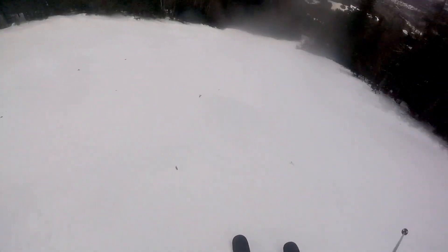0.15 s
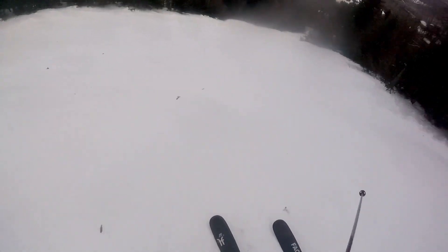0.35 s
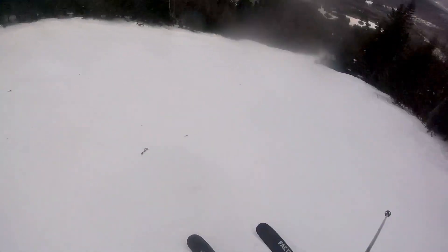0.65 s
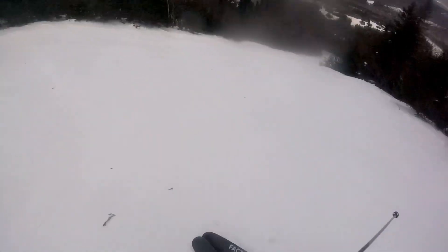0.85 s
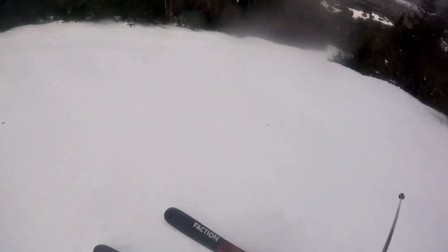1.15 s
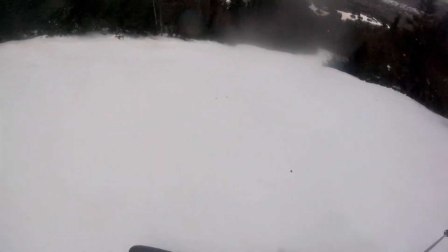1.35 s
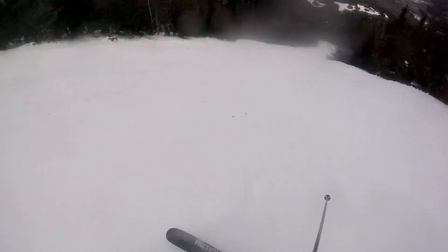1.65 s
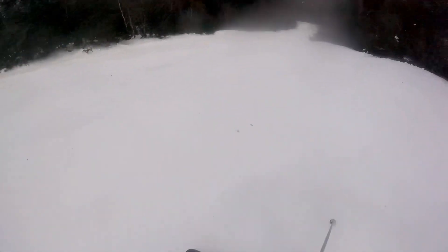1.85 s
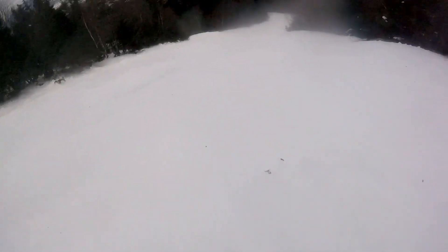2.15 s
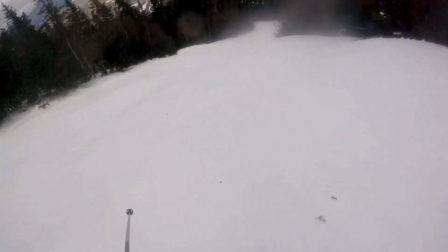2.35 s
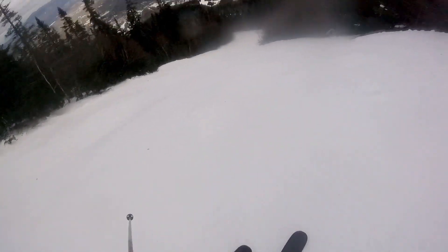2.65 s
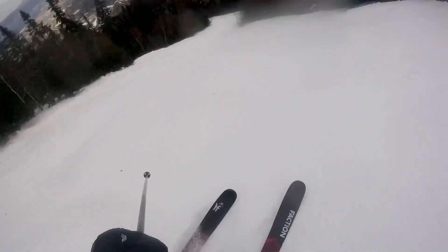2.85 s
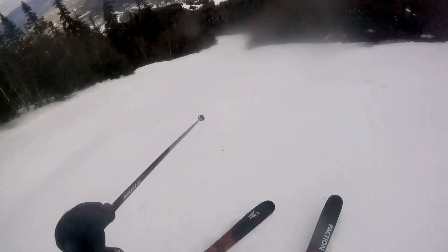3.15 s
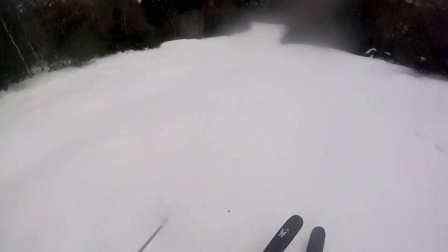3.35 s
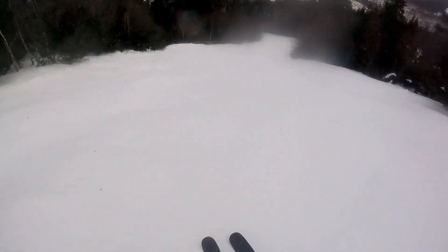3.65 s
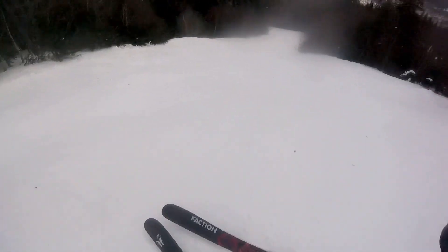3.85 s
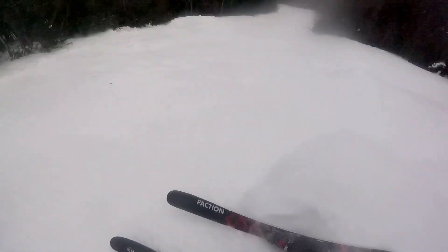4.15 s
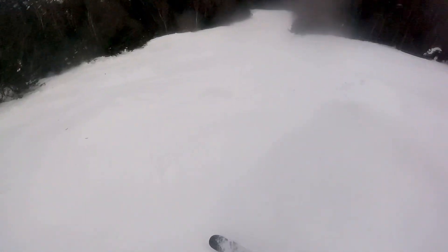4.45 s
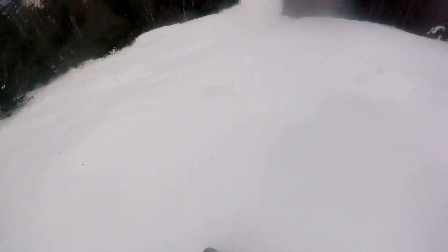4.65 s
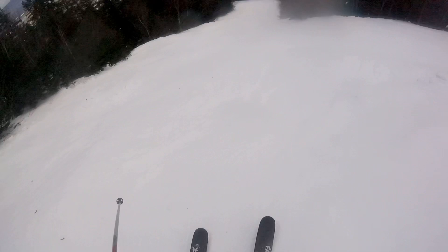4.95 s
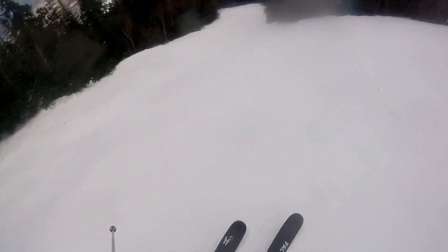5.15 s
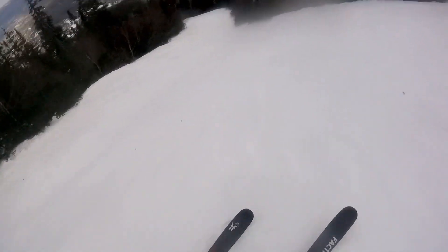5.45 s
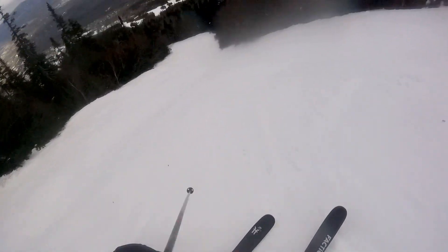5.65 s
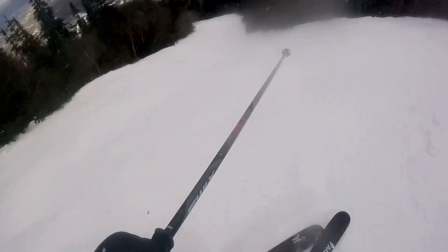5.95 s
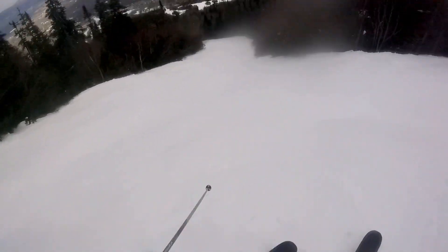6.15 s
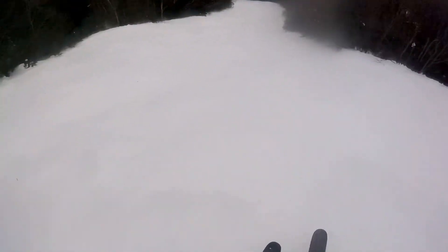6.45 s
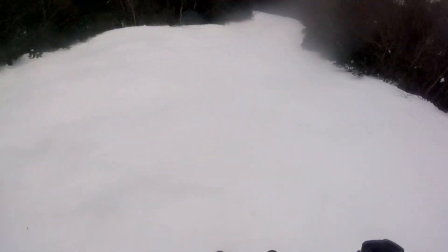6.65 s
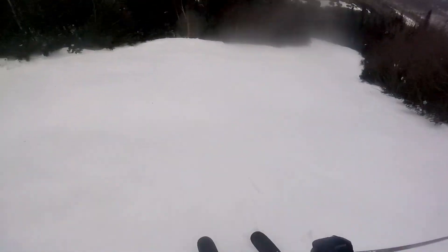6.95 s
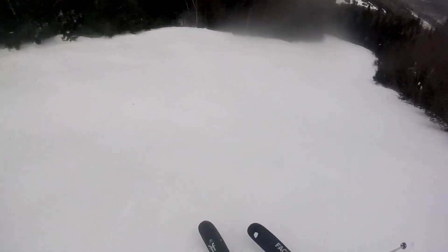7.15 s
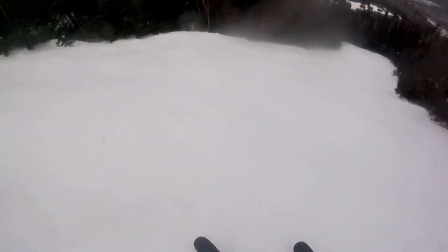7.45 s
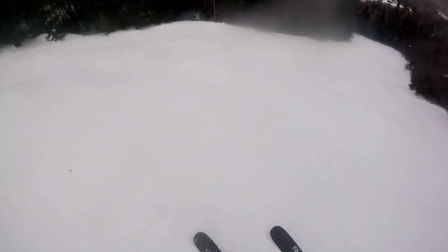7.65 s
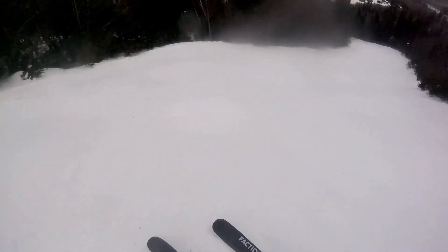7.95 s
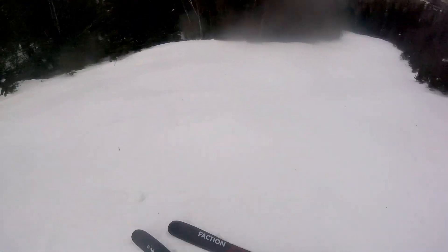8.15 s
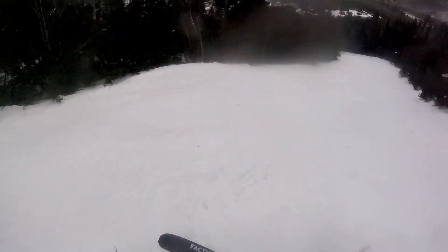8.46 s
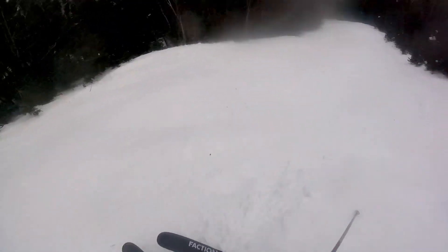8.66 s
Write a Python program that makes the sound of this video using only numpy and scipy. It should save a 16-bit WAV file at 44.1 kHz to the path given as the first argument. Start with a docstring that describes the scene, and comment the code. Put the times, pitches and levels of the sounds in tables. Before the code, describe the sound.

Grainy snow scrape swells and fades with each ski turn while wind rumbles softly; bumps thud, and a hard double knock briefly ducks the sound.

```python
"""Rumbling air and the hiss of skis come first, and a low thump soon follows as a skier turns down a bumpy slope.
In each turn the edges break countless snow grains, whose hiss and crunch ring in a worn camera's plastic case.
Bumps make the skis knock and the camera mount thump; bindings clack, and edges or pole tips scuff the snow.
Hard jolts and clacks close together drive the camera's gain control down, and it recovers over several seconds."""
import sys
import numpy as np
from scipy import signal
from scipy.fft import rfft, irfft, next_fast_len
from scipy.io import wavfile
from scipy.ndimage import uniform_filter1d

SR = 44100
rng = np.random.default_rng(int(sys.argv[2]) if len(sys.argv) > 2 else 0)


def unload_wav(signal):
    """Save mono or channel-first audio to the path in sys.argv[1] as 16-bit WAV at rate SR, clipped to [-1, 1]."""
    wavfile.write(
        sys.argv[1],
        SR,
        np.round(np.clip(np.atleast_2d(signal).T, -1, 1) * 32767).astype(np.int16),
    )


N = 388505
TIME = np.arange(N) / SR

# bumps in the slope: start_s, thump_db (of the mount), pitch_hz, t60_s (time to fade by 60 dB), knock_db (of the skis)
BUMP_EVENTS = [(0.216, -32.5, 87.5, 0.23, -42), (.627, -25, 78, 0.14, -46), (.716, -22.5, 91, 0.14, -55),
               (1.527, -9.5, 83.4, 0.16, -33), (1.584, -26.5, 89.7, 0.32, -43),
               (3.057, -11, 98.6, 0.21, -30), (3.202, -24, 95.3, 0.19, -43), (3.67, -28, 73, 0.33, -55),
               (3.789, -24.5, 92, 0.23, -29), (3.926, -20, 96, 0.16, -32), (4.058, 2, 97.7, 0.087, -8),
               (4.119, -5, 95.5, .11, -21), (4.167, -5.5, 90, 0.064, -26), (4.178, 8.5, 99, 0.11, -1.5),
               (4.301, -21.5, 97.4, 0.2, -34), (5.046, -18.5, 98.6, 0.3, -30.5),
               (5.819, -28.5, 80, 0.3, -49), (6.099, -34, 94.7, 0.38, -57), (6.858, -27.5, 72.5, 0.42, -51),
               (7.108, -10.5, 73.6, 0.14, -39.5), (7.368, -2, 89, 0.024, -31),
               (7.457, -24, 82.6, 0.15, -58), (7.543, -26.5, 76.5, 0.25, -62), (8.367, -16, 98, .22, -36.5)]
# resonances and dips of the plastic case: pitch_hz, width_hz, height_db (above or below the broad spectrum)
CASE_RESONANCES = [(520, 240, 8.5), (792, 112, 11), (1199, 170, 9), (1928, 104, 10), (2106, 250, 5),
                   (2665, 280, 4.5), (3267, 200, 6), (3923, 230, 7), (4540, 310, -16.5), (5076, 530, 8.5),
                   (5504, 226, 7.5), (6060, 240, -5.5), (6428, 490, 11), (7690, 400, 5.5),
                   (8300, 290, -4.5)]
# broad spectrum of fine snow grains: pitch_hz, relative level_db (per Hz)
HISS_SPECTRUM = [(500, -40), (1500, -38), (2600, 1), (3500, -4), (5200, -2), (7000, -7.5), (8200, -10),
                 (9200, -19), (10000, -82), (14000, -48)]
# broad spectrum of coarse snow grains: pitch_hz, relative level_db (per Hz)
CRUNCH_SPECTRUM = [(80, -13.5), (200, -14.5), (400, -9.5), (700, -5.5), (1100, 1), (1600, -0.5),
                   (2300, 0.5), (3300, -6), (4500, -19), (8000, -31.5)]


def from_db(db):
    """Turn decibels into a multiplier."""
    return 10 ** (np.asarray(db) / 20)


def rms_one(x):
    """Scale to an average strength (rms) of 1."""
    return x / np.sqrt(np.mean(x ** 2) + 1e-20)


def add(out, start_s, sound):
    """Mix a sound in at a given time."""
    start = round(start_s * SR)
    out[start:start + len(sound)] += sound[:N - start]


def swell(centre_s, half_length_s):
    """A smooth rise and fall of height 1 around a moment."""
    return np.exp(-np.minimum(((TIME - centre_s) / half_length_s) ** 2, 50))


def drift(rate_hz):
    """Smooth random wandering with spread 1, made from slowed-down noise."""
    step = 20  # samples between the points that are joined up
    smoothing = np.exp(-2 * np.pi * step * rate_hz / SR)
    noise = rng.standard_normal(N // step + 2002)
    slow = signal.lfilter([1], [1, -2 * smoothing, smoothing ** 2], noise)
    slow = rms_one(slow[2000:])  # drop the filter's start-up
    return np.interp(np.arange(N) / step, np.arange(len(slow)), slow)


def coloured(x, spectrum, resonances=()):
    """Give a steady sound a broad spectrum with resonances on top; rms 1."""
    size = next_fast_len(N)
    hz = np.maximum(np.arange(size // 2 + 1) * SR / size, 1)
    points_hz, points_db = np.transpose(spectrum)
    level_db = np.interp(np.log(hz), np.log(points_hz), points_db)
    for centre_hz, width_hz, height_db in resonances:
        level_db = level_db + height_db / (1 + (2 * (hz - centre_hz) / width_hz) ** 2)
    return rms_one(irfft(rfft(x, size) * from_db(level_db), size)[:N])


def grains(per_s, spread_db):
    """Clicks at random moments, like snapping snow crystals: most are small, a few large."""
    sizes = from_db(spread_db * np.minimum(rng.exponential(1, N), 5))
    signs = rng.choice([-1, 1], N)
    snaps = rng.random(N) < per_s / SR
    return sizes * signs * snaps


def resonant_noise(pitch_hz, width_hz):
    """Noise rung through one resonance; rms 1."""
    b, a = signal.iirpeak(pitch_hz, pitch_hz / width_hz, fs=SR)
    return rms_one(signal.lfilter(b, a, rng.standard_normal(N)))


def wind(whistle_hz=752, whistle_width_hz=10, whistle_db=-63):
    """Soft buffets of air over a rumble that surges at each bump, and a faint hollow note blown on the case."""
    # air past the case, following the skier's speed: time_s, level_db
    air_levels = [(0, -40), (.65, -41.5), (1.4, -41), (2.1, -47.5), (2.6, -41.5), (3.0, -34.5),
                  (3.5, -40.5), (3.95, -38), (4.6, -45.5), (5.7, -38), (6.55, -45.5), (6.9, -35),
                  (7.55, -42), (7.9, -45), (8.4, -38), (8.81, -42)]
    # broad spectrum of the moving air: pitch_hz, relative level_db (per Hz)
    air_spectrum = [(5, -28.5), (22, 4), (45, -6), (70, -6), (95, -3), (130, -16), (200, -20.5),
                    (400, -25.5), (1000, -43), (4000, -85)]
    # gust level for a thump of 0 dB, dB of gust per dB of thump, and half length in s
    gust_db, gust_follows, gust_s = -25, 0.37, 0.036

    level_db = np.interp(TIME, *np.transpose(air_levels))
    low_pass = signal.butter(2, 70, fs=SR, output="sos")
    buffets = signal.sosfilt(low_pass, rms_one(grains(per_s=30, spread_db=2.2)))
    flow = buffets + .45 * rng.standard_normal(N)

    # a bump jerks the case through the air
    gusts = 0
    for start_s, thump_db, *_ in BUMP_EVENTS:
        gusts = gusts + from_db(gust_db + gust_follows * thump_db) * swell(start_s + gust_s / 2, gust_s)
    rumble = np.hypot(from_db(level_db), gusts) * coloured(flow, air_spectrum)
    airspeed = np.sqrt(from_db(level_db - np.median(level_db)))
    whistle = from_db(whistle_db) * airspeed * resonant_noise(whistle_hz, whistle_width_hz)
    return rumble + whistle


def edging():
    """Hiss and crunch in dB: each turn builds, holds and fades, while the terrain varies the load on the edges."""
    # turns: set_s (edges fully set), let_go_s, build_s, fade_s, hiss_db (before skid's lift), crunch_db
    turn_events = [(0.153, 0.76, 0.23, .3, -41, -46.5), (0.79, 1.45, 0.36, 0.65, -37, -41.5),
                   (2.658, 3.196, 0.28, 0.11, -38.5, -43), (3.815, 4.06, .28, 0.64, -38, -42.5),
                   (5.267, 5.648, 0.52, 0.09, -38, -42), (5.86, 6, 0.27, 0.66, -43.5, -44),
                   (6.77, 7.643, 0.17, 0.46, -39.5, -45.5), (8.21, 8.55, 1, 0.36, -39.5, -46)]
    # humps load the skis, hollows unweight them: centre_s, change_db (of the scrape), half_length_s
    terrain_events = [(0.333, 5, 0.062), (0.843, 6, 0.049), (0.981, -8, 0.017), (1.36, 2.5, .03),
                      (1.421, -7.5, 0.022), (2.726, 5.5, 0.058), (3.12, 6.5, 0.082), (4.018, -14, 0.018),
                      (4.135, -13, .035), (5.493, 4.5, 0.032), (5.91, 4, .03), (7.04, -1.5, .06),
                      (7.365, 3.5, 0.056), (7.84, 0.5, .06)]
    swing_db = 20  # rise over one build-up, fall over one fade
    flat_hiss_db, flat_crunch_db = -62.5, -59.5  # skis running flat between turns

    turn_hiss, turn_crunch = 0, 0
    for set_s, let_go_s, build_s, fade_s, hiss_db, crunch_db in turn_events:
        outside = np.maximum((set_s - TIME) / build_s, (TIME - let_go_s) / fade_s)
        grip = from_db(-swing_db * np.maximum(outside, 0))
        turn_hiss = np.maximum(turn_hiss, from_db(hiss_db) * grip)
        turn_crunch = np.maximum(turn_crunch, from_db(crunch_db) * grip)
    load_db = sum(change_db * swell(s, half_s) for s, change_db, half_s in terrain_events)
    load = from_db(load_db)
    hiss_power = from_db(flat_hiss_db) ** 2 + (load * turn_hiss) ** 2
    crunch_power = from_db(flat_crunch_db) ** 2 + (load * turn_crunch) ** 2
    return 10 * np.log10(hiss_power), 10 * np.log10(crunch_power)


def patchy(x, depth_db, rate_hz):
    """Crystals of different sizes break in separate clumps, so each pitch range flutters on its own."""
    size = next_fast_len(N)
    hz = np.arange(size // 2 + 1) * SR / size
    centres_hz = np.geomspace(500, 8000, 8)
    spectrum, out = rfft(x, size), 0
    for band in np.eye(len(centres_hz)):
        share = np.interp(hz, centres_hz, band)  # overlapping triangles split up the pitches
        band_sound = irfft(spectrum * share, size)[:N]
        out = out + band_sound * from_db(depth_db * drift(rate_hz))
    return out


def skid(edge_db, packed_db, chatter_db=1.5, chatter_hz=40, hiss_lift_db=1.5, glide_db=-57.0, glide_follow=0.057):
    """The edges grip and slip, so hiss and crunch swell together; the flat bases add a smooth, bright glide."""
    # broad spectrum of the gliding bases: pitch_hz, relative level_db (per Hz)
    glide_spectrum = [(600, 0.5), (2500, -8.5), (7000, -2.5), (9300, -1.5), (10300, -14), (14000, -21.5)]
    grip = from_db(chatter_db * drift(chatter_hz))
    fine = patchy(grains(per_s=24000, spread_db=2.5), depth_db=2.15, rate_hz=20) * grip
    coarse = patchy(grains(per_s=8000, spread_db=2.0), depth_db=3.0, rate_hz=27.4) * grip
    hiss = from_db(edge_db + hiss_lift_db) * coloured(fine, HISS_SPECTRUM, CASE_RESONANCES)
    crunch = from_db(packed_db) * coloured(coarse, CRUNCH_SPECTRUM, CASE_RESONANCES)
    glide = coloured(rng.standard_normal(N), glide_spectrum, CASE_RESONANCES)
    return hiss + crunch + from_db(glide_db + glide_follow * edge_db) * glide


def edge_ring(packed_db, ring_hz=1178, width_hz=55, ring_db=-8, flare_db=5.0, flare_hz=14,
              hard_bite_db=-40, growth=1.72):
    """When an edge bites hard, one resonance flares up in short spells."""
    # the ring grows faster than the crunch: growth is dB of ring per dB of crunch
    level_db = hard_bite_db + growth * (packed_db - hard_bite_db) + ring_db
    flares_db = flare_db * np.tanh(drift(flare_hz))
    return from_db(level_db + flares_db) * resonant_noise(ring_hz, width_hz)


def bumps(overtone_hz=199, overtone_db=-22, overtone_stretch=0.78):
    """Each jolt sets the camera swinging on its mount: a low, dying note with a weak overtone."""
    out, t = np.zeros(N), TIME[:SR // 2]
    attack = 1 - np.exp(-t / .0013)
    for start_s, thump_db, pitch_hz, t60_s, _ in BUMP_EVENTS:
        decay_db = -60 * t / t60_s
        swing = from_db(decay_db) * np.sin(2 * np.pi * pitch_hz * t)
        overtone_level = from_db(overtone_db + decay_db / overtone_stretch)  # dies sooner
        overtone = overtone_level * np.sin(2 * np.pi * overtone_hz * t)
        add(out, start_s, from_db(thump_db) * attack * (swing - overtone))
    return out


def contacts():
    """Every blow as (start_s, level_db, contact_hz): bump knocks, duller when softer, then separate taps and clacks."""
    # taps and clacks of skis and bindings, soft or hard: start_s, level_db (over about 10 ms),
    # pitch_hz (most strongly excited)
    clack_events = [(.661, -38.5, 300), (3.787, -27, 2340), (3.924, -39, 2000), (4.058, -19, 4500),
                    (4.115, -27.5, 3050), (4.163, -26, 3000), (4.174, -5, 1950), (4.176, -18, 5450),
                    (5.047, -37.5, 1100), (6.486, -44.5, 1280), (7.307, -41, 378), (8.334, -37.5, 785)]
    full_knock_hz, db_per_octave = 650, 37  # pitch of a 0 dB knock; each 37 dB softer halves it
    blows = []
    for start_s, _, _, _, knock_db in BUMP_EVENTS:
        blows.append((start_s, knock_db, full_knock_hz * 2 ** (knock_db / db_per_octave)))
    return blows + list(clack_events)


def knocks(rattle=0.017, rattle_s=0.005, vary_db=5.0, spread_octaves=0.71, crack_s=0.0039, crack_width=1.8):
    """A blow and a brief rattle ring the ski, while crushed snow adds a dense crack around the contact pitch."""
    # ring of ski and binding: pitch_hz, level_db, t60_s (time to fade by 60 dB)
    ski_modes = [(190, -3, .04), (240, -5, .04), (320, -5, .028), (410, -6, .022), (540, -4, .028),
                 (660, -7, .016), (775, 1, .025), (960, -2, .016), (1170, 2, .025), (1400, -10, .014),
                 (1900, -2, .012), (2200, -2, .02), (2600, -3, .012), (2950, -8, .008), (3800, -11, .005),
                 (5560, -2, .015), (6430, -3, .013), (1830, -27, .13), (2050, -33, .22)]
    out, t = np.zeros(N), TIME[:SR // 4]
    hz, mode_db, t60_s = np.transpose(ski_modes)
    fading = from_db(mode_db[:, None] - 60 * t / t60_s[:, None])
    modes = fading * np.sin(2 * np.pi * hz[:, None] * t)
    signs = (-1) ** np.arange(len(hz))
    for start_s, level_db, contact_hz in contacts():
        force = rattle * rng.standard_normal(len(t)) * np.exp(-t / rattle_s)
        force[0] += 1  # the blow itself
        # modes near the contact pitch ring most, each with some chance in its strength
        nearness = 1 / (1 + (np.log2(hz / contact_hz) / spread_octaves) ** 2)
        strength = from_db(vary_db * rng.standard_normal(len(hz))) * nearness
        ring = signal.fftconvolve(force, (signs * strength) @ modes)[:len(t)]
        ring = ring / np.sqrt(np.mean(ring[:SR // 100] ** 2))  # rms 1 over the first 10 ms
        edges_hz = [contact_hz / crack_width, min(contact_hz * crack_width, SR / 3)]
        band = signal.butter(2, edges_hz, "band", fs=SR, output="sos")
        crack = rms_one(signal.sosfilt(band, rng.standard_normal(len(t)))) * np.exp(-t / crack_s)
        add(out, start_s, from_db(level_db) * (ring + crack) / np.sqrt(2))
    # the case keeps out the highest treble
    return signal.sosfilt(signal.butter(8, 7800, fs=SR, output="sos"), out)


def scuffs(rise_s=0.00093, fall_s=0.0013):
    """An edge or pole tip cuts briefly into the crust and throws a dense spray of fine or coarse grains."""
    # scuffs: start_s, level_db, length_s, coarseness (0 fine to 1 coarse)
    scuff_events = [(1.552, -38, 0.018, 0.7), (3.338, -42, 0.011, 0.6), (3.657, -39.5, 0.023, 0.12),
                    (4.04, -33, 0.057, 0.3), (4.268, -39.5, 0.018, 0.03), (4.324, -37.5, 0.027, .1),
                    (4.728, -49.5, 0.0081, 0), (4.795, -54, 0.0028, 0), (5.743, -33.5, 0.033, 0.02),
                    (6.193, -42, 0.0055, 0.4), (6.619, -48, 0.029, .1), (7.105, -35.5, 0.038, 0.02),
                    (8.163, -44, 0.011, 1), (8.305, -31, 0.0079, 0)]
    fine = coloured(grains(per_s=15000, spread_db=1.5), HISS_SPECTRUM, CASE_RESONANCES)
    coarse = coloured(grains(per_s=8700, spread_db=8.0), CRUNCH_SPECTRUM, CASE_RESONANCES)
    out, t = np.zeros(N), TIME[:SR // 8]
    for k, (start_s, level_db, length_s, coarseness) in enumerate(scuff_events):
        part = slice(k * len(t), (k + 1) * len(t))  # fresh grains for each scuff
        share = np.clip(coarseness, 0, 1)
        spray = np.sqrt(1 - share) * fine[part] + np.sqrt(share) * coarse[part]
        envelope = np.minimum(t / rise_s, 1) * np.exp(-np.maximum(t - length_s, 0) / fall_s)
        add(out, start_s, from_db(level_db) * envelope * spray)
    return out


def scene(self_noise_db=-72):
    """All sources over the microphone's own hiss."""
    edge_db, packed_db = edging()
    snow = skid(edge_db, packed_db) + edge_ring(packed_db)
    blows = bumps() + knocks() + scuffs()
    self_noise = from_db(self_noise_db) * rng.standard_normal(N)
    return (wind() + snow + blows + self_noise)[None]


def gain_control(x, threshold_db=-10.5, recovery_s=1.85):
    """Sound above the threshold turns the gain down at once; it creeps back slowly."""
    power = uniform_filter1d(x ** 2, SR // 100)  # averaged over 10 ms
    level_db = 10 * np.log10(np.maximum(power, 1e-12))
    recovery = np.exp(-TIME / recovery_s)
    excess_db = np.maximum(level_db - threshold_db, 0)
    # the running maximum holds the deepest cut so far, which fades by the recovery curve
    cut_db = np.maximum.accumulate(excess_db / recovery, axis=-1) * recovery
    return x * from_db(-cut_db)


def record(dry):
    """The gain control acts, the highest peaks are rounded and the top treble is cut."""
    top, cutoff_hz = .9, 14900
    rounded = top * np.tanh(gain_control(dry) / top)
    return signal.sosfilt(signal.cheby2(12, 70, cutoff_hz, fs=SR, output="sos"), rounded)


dry = scene()
out = record(dry)
unload_wav(out)
```